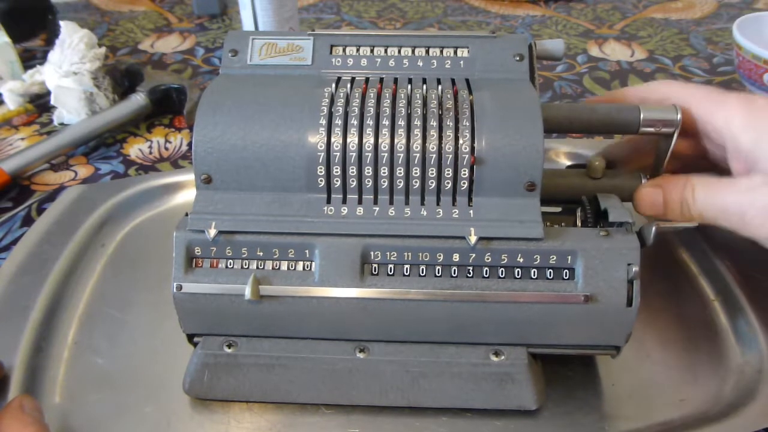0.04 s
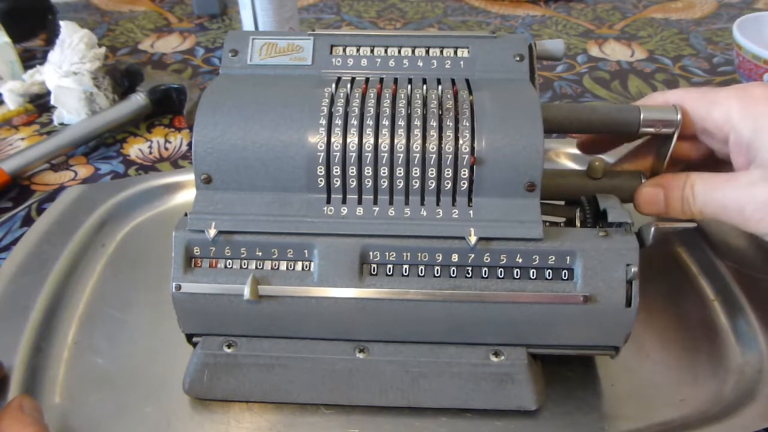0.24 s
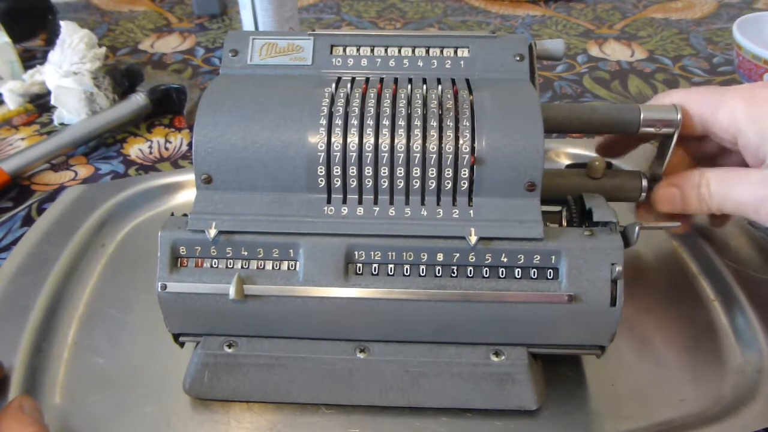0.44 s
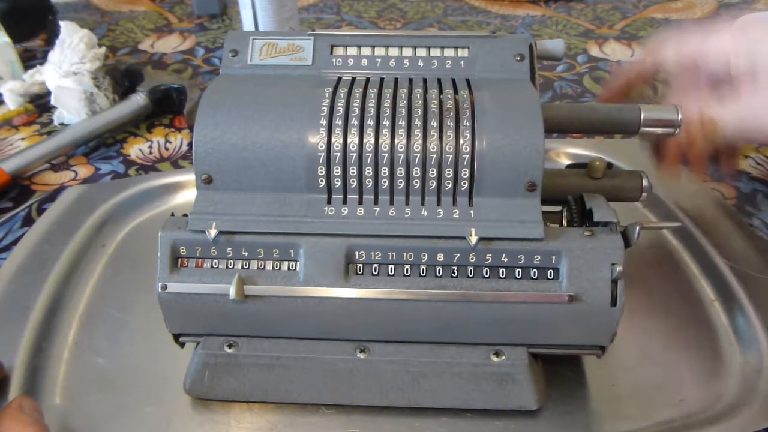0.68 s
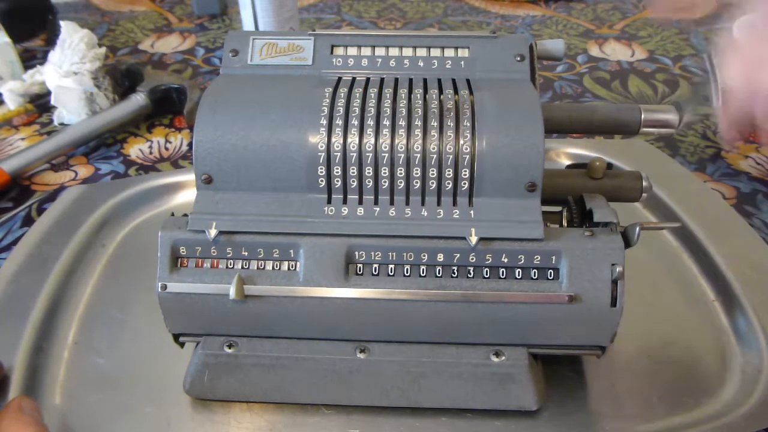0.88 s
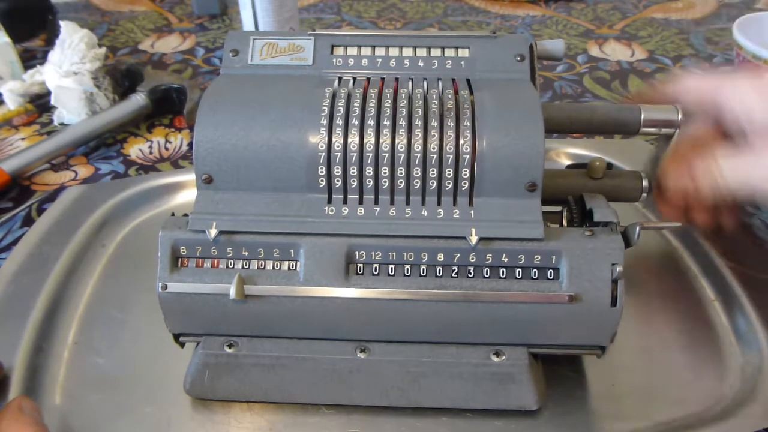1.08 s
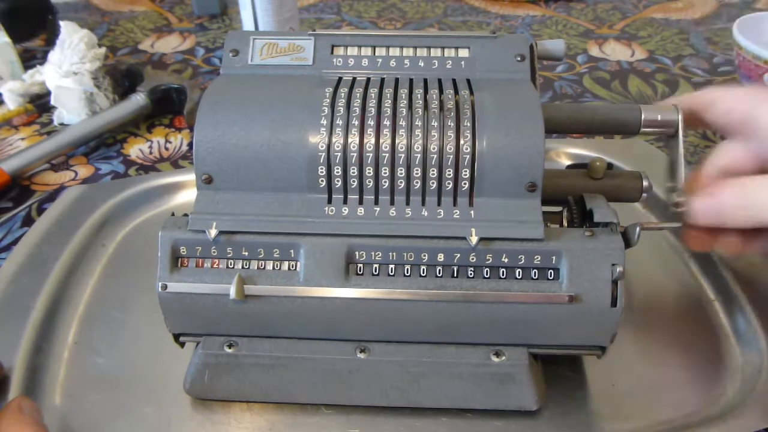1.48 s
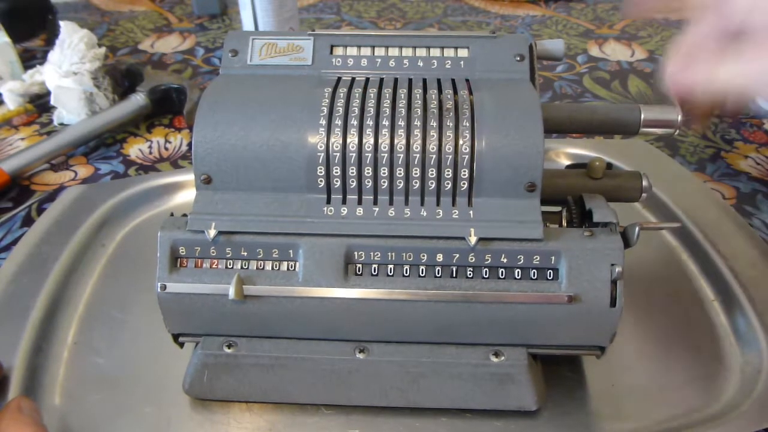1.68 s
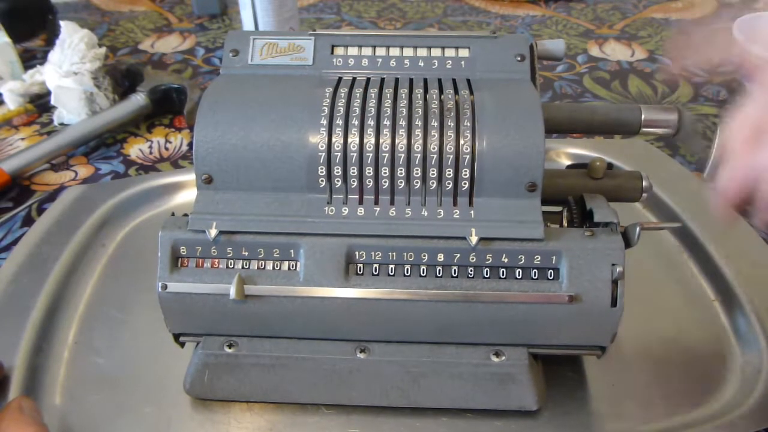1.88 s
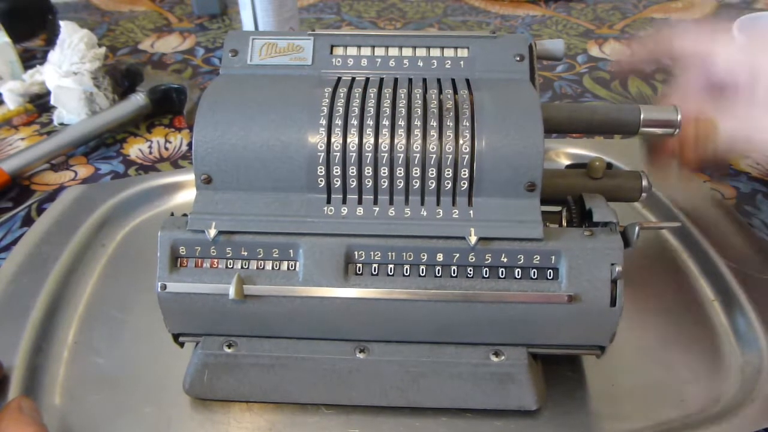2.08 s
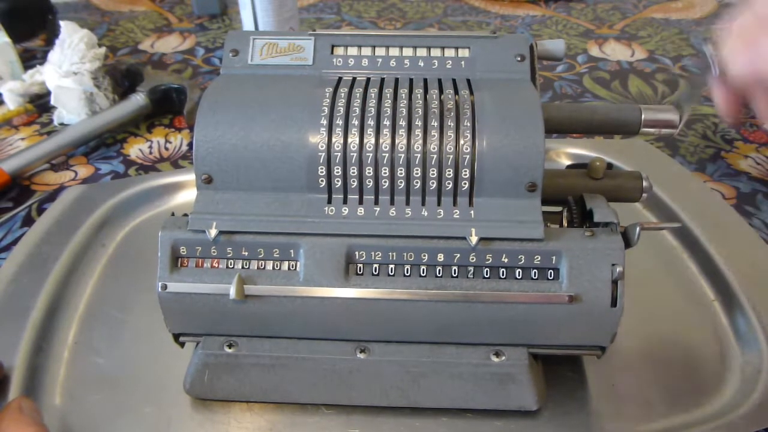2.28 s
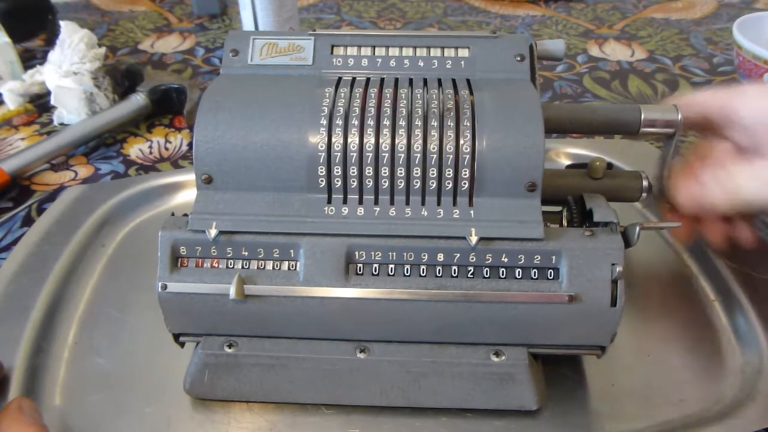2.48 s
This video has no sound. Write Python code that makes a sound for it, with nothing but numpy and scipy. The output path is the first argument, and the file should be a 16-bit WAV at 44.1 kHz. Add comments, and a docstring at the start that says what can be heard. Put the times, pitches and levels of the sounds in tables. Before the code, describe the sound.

A mechanical calculator is worked close up in a small room. A faint high bell fades from the start while a metal lever clacks at 0.15 seconds and again around 0.4. The handle pings lightly at 0.6. The crank then turns four times, at about 0.9, 1.3, 1.8 and 2.3 seconds, each a quick ratchet rattle with snaps and a soft bump. Gears rumble and parts tick between.

```python
"""Pinwheel calculator on a metal tray.

Close up in a small room, its bell is still dying away as a lever clacks over and back.
Loose parts tick and the handle pings. The hand crank makes four turns: the gears rumble,
and on each turn the machine rocks, a pawl rattles over eight teeth and the carry levers
snap after it."""
import sys
import numpy as np
from scipy import signal
from scipy.io import wavfile

SR = 44100
rng = np.random.default_rng(int(sys.argv[2]) if len(sys.argv) > 2 else 0)


def generate_wav(sig):
    """Save sig (samples, or channels by samples) to the path in sys.argv[1] as 16-bit PCM at SR."""
    pcm = np.round(np.clip(np.atleast_2d(sig).T, -1, 1) * 32767).astype(np.int16)
    wavfile.write(sys.argv[1], SR, pcm)


N = 116865


def amp(db):
    """Decibels to gain."""
    return 10 ** (np.asarray(db) / 20)


def unit(x):
    """Scales to a mean energy of 1 per channel."""
    return x / np.sqrt(np.mean(np.sum(x ** 2, -1)) + 1e-20)


def at_hz(points, hz):
    """Interpolates a table on a log-frequency axis."""
    freq_hz, value = np.transpose(points)
    return np.interp(np.log(hz + 1), np.log(freq_hz + 1), value)


def add(mix, start_s, sound):
    """Mixes a sound in at start_s."""
    part = mix[:, max(round(start_s * SR), 0):][:, :sound.shape[-1]]
    part += sound[..., :part.shape[-1]]


def convolve(x, response):
    """Passes both channels through an impulse response."""
    return signal.fftconvolve(x, np.atleast_2d(response), axes=1)[:, :N]


def pan(left_minus_right_db):
    """Left and right gains."""
    return amp([[left_minus_right_db / 2], [-left_minus_right_db / 2]])


def correlate(noises, correlation=0.85):
    """Blends two independent noises into a stereo pair."""
    mid = np.sqrt((1 + correlation) / 2) * noises[0]
    side = np.sqrt((1 - correlation) / 2) * noises[1]
    return np.array([mid + side, mid - side])


def colour(x, spectrum, size=4096):
    """Minimum-phase filter of energy 1, shaped like the spectrum."""
    log_gain = np.log(amp(at_hz(spectrum, abs(np.fft.fftfreq(size, 1 / SR)))))
    response = np.fft.ifft(np.exp(np.conj(signal.hilbert(log_gain)))).real
    return convolve(x, unit(response[:size // 2]))


def ring(modes, rise_s=1e-5):
    """Damped sines; each level sets that mode's energy."""
    t = np.arange(SR // 3) / SR
    attack = 1 - np.exp(-t / rise_s)
    return sum(amp(level_db) * unit(amp(-60 * t / t60_s) * attack * np.sin(2 * np.pi * hz * t))
               for hz, level_db, t60_s in modes)


def resonate(x, modes, gain_db):
    """The ringing that a sound raises in a set of modes."""
    return amp(gain_db) * convolve(x, unit(ring(modes)))


def contact(decay_s, rise_s, size=2048):
    """Metal meets metal: a brief flurry of micro-impacts, energy 1."""
    t = np.arange(size) / SR
    noise = correlate(rng.standard_normal((2, size)))
    return unit(noise * np.exp(-t / decay_s) * (1 - np.exp(-t / rise_s)))


# Room decay: freq_hz, t60_s
ROOM_DECAY = [(100, 0.34), (500, 0.33), (1400, 0.32), (4000, 0.25), (9000, 0.28), (15000, 0.16)]
# Left-right likeness of the echo: freq_hz, correlation
ROOM_CORRELATION = [(100, 1), (700, .94), (1500, 0.89), (4000, 0.91), (12000, 0.69)]


def room_tail(size=256, onset_s=0.0013):
    """A dense echo, each band dying at its own rate."""
    hz, frame_s, bands = signal.stft(rng.standard_normal((2, SR * 2 // 3)), SR, nperseg=size)
    bands = correlate(bands, at_hz(ROOM_CORRELATION, hz)[:, None])
    decay = amp(-60 * frame_s / at_hz(ROOM_DECAY, hz)[:, None])
    echo = signal.istft(bands * decay, SR, nperseg=size)[1]
    t = np.arange(echo.shape[1]) / SR
    return unit(echo * (1 - np.exp(-(t / onset_s) ** 2)))


def room(x, wet_db, tails=4, cycle_s=0.03):
    """A sound plus its echo; tails take turns, so no two hits echo quite alike."""
    position = np.arange(N) / SR / cycle_s * tails
    distances = [np.minimum(abs((position - k) % tails - tails / 2), 1) for k in range(tails)]
    echo = sum(convolve(x * np.cos(np.pi / 2 * d), room_tail()) for d in distances)
    return x + amp(wet_db) * echo


def hush():
    """Faint, dull, steady room noise."""
    # freq_hz, level_db
    spectrum = [(20, 8), (60, -11), (200, -3), (1000, 0), (4000, -43), (15000, -43)]
    return amp(-63.5) * colour(correlate(rng.standard_normal((2, N)), 0.52), spectrum)


# Bell modes: freq_hz, level_db, t60_s
BELL_MODES = [(4050, -31.5, 1.37), (4043.5, -61, 1.2), (9900, -52, 0.35)]


def bell():
    """The last of a stroke on the small warning bell."""
    t = np.arange(N) / SR
    return pan(-2) * sum(amp(level_db - 60 * t / t60_s) * np.sin(2 * np.pi * hz * t)
                         for hz, level_db, t60_s in BELL_MODES)


# Lever blows: start_s, crack_db, knock_db, lever_db, case_db, case_hz, thud_db
LEVER_BLOWS = [(0.1359, -1, -6.5, 5, -19, 800, -41), (0.1591, -3, 8, 4, 5, 762, -39),
               (0.1639, -1.5, -7.5, 0.5, -1.5, 717, -28), (0.3384, 1, -2, -2.5, 6.5, 740, -22.5),
               (.3648, -0.5, 2.5, 5.5, 4.5, 714, -31), (0.4018, -3, -8, 2.5, -4, 764, -13),
               (0.4066, -0.5, -6, -0.5, 10.5, 795.4, -3.5), (0.4163, -3.5, 1.5, -4, 10, 795, -6.5),
               (0.4244, -1.5, -5, 1, -26, 760, -20)]
# Lever modes: freq_hz, level_db, t60_s
LEVER_MODES = [(1204, -15, 0.12), (1538, -21, 0.07), (1634, -10.5, 0.072), (1830, -4, 0.013),
               (2890, -13, 0.075), (3950, -11, 0.022), (5435, -12.5, 0.01), (7070, -11, 0.013)]
# Case modes: pitch_ratio, level_db, t60_s
CASE_MODES = [(.9, -17, 0.037), (1.001, -2.5, 0.063), (1.09, -8.5, 0.028)]
# Spectra of a blow's three parts: freq_hz, level_db
CRACK_SPECTRUM = [(60, -17.5), (500, -26.5), (1000, -16), (2300, -5.5), (3600, -2.5), (7000, 0),
                  (10000, -2.5), (15500, -14.5)]
KNOCK_SPECTRUM = [(60, -25), (450, -17), (700, -6.5), (1150, -0.5), (1700, 2), (2400, -2.5), (3300, 2.5),
                  (5500, -6.5), (9000, -47), (15500, -31)]
THUD_SPECTRUM = [(30, -18), (80, -15), (125, 1.5), (200, -2.5), (320, 5.5), (470, 0), (650, -2), (1500, 1),
                 (8000, -55)]


def lever_clacks(ring_rise_s=0.0022):
    """Each blow cracks, knocks and thuds into the tray, and rings the lever and the case."""
    crack, knock, thud, rings = np.zeros((4, 2, N))
    for start_s, crack_db, knock_db, lever_db, case_db, case_hz, thud_db in LEVER_BLOWS:
        add(crack, start_s, amp(crack_db) * contact(decay_s=0.0024, rise_s=0.001))
        add(knock, start_s, amp(knock_db) * contact(decay_s=0.0028, rise_s=0.00038))
        lever = [(hz * (1 + 0.012 * rng.standard_normal()), db, t60_s) for hz, db, t60_s in LEVER_MODES]
        case = [(ratio * case_hz, db, t60_s) for ratio, db, t60_s in CASE_MODES]
        add(rings, start_s, amp(lever_db) * ring(lever, ring_rise_s))
        add(rings, start_s, amp(case_db) * ring(case, ring_rise_s))
        add(thud, start_s, amp(thud_db) * contact(decay_s=0.0062, rise_s=0.0045))
    blows = colour(crack, CRACK_SPECTRUM) + colour(knock, KNOCK_SPECTRUM) + colour(thud, THUD_SPECTRUM)
    return amp(0.5) * (pan(-1.5) * room(blows, wet_db=-1) + room(rings, wet_db=-6.5, tails=2))


# Light contacts: start_s, level_db
TICK_HITS = [(.567, -5), (0.6239, -7), (0.7723, -30), (0.7875, -8.5), (0.8317, -10.5), (1.2484, -6.5),
             (1.29, -17), (1.6199, -9.5), (1.6917, -13.5), (1.763, -13.5), (2.0858, -10.5), (2.1285, -11.5),
             (2.170, -6), (2.2222, -15), (2.4759, -6), (2.5731, -8.5), (2.642, -16)]
# Tick spectrum: freq_hz, level_db
TICK_SPECTRUM = [(100, -22), (600, 2), (1800, -2), (3200, 0.5), (6000, 0.5), (9000, -5), (15500, -10.5)]


def ticks():
    """The handle and loose parts touch lightly."""
    hits = np.zeros((2, N))
    for start_s, level_db in TICK_HITS:
        add(hits, start_s, amp(level_db) * contact(decay_s=0.0013, rise_s=0.0002))
    return amp(-8) * pan(-1.26) * room(colour(hits, TICK_SPECTRUM), wet_db=-1, tails=2)


# Handle modes: freq_hz, level_db, t60_s
HANDLE_MODES = [(3100, -15, .07), (5850, -12, .05), (6500, -16, .04), (12400, -30, .06)]


def handle_ping(start_s=0.5678):
    """The handle rings as the hand lets go."""
    ping = np.zeros((2, N))
    add(ping, start_s, ring(HANDLE_MODES, rise_s=0.00047))
    return ping


# Gear noise envelope: time_s, level_db
GEAR_ENVELOPE = [(0, -5), (.3, -4.5), (.55, -3.5), (.65, 5), (.74, 5.5), (.79, 10.5), (.95, 8.5),
                 (1.13, 2.5), (1.2, 4), (1.28, 8), (1.45, 3.5), (1.6, 0.5), (1.68, 5), (1.76, 8.5),
                 (2.05, 2), (2.2, 7.5), (2.4, 7.5), (2.55, 2), (2.65, 5)]
# Gear spectrum: freq_hz, level_db
GEAR_SPECTRUM = [(40, -26), (130, -24.5), (210, -9.5), (600, 1.5), (900, 11.5), (1900, 11), (2600, 4),
                 (4500, 3.5), (9000, -1.5), (15500, -11.5)]
# Housing and tray modes: freq_hz, level_db, t60_s
HOUSING_MODES = [(781, -2, 0.21), (817.6, 3.5, 0.14), (922.5, 3, 0.055), (1057, -1, 0.093),
                 (1153, -2.5, 0.17), (1462.5, -1.5, 0.078), (1828, -12, 0.077), (1869, 2.5, 0.1),
                 (4350, -5, 0.036)]
TRAY_MODES = [(216.2, -0.5, 0.75), (325, -7, 0.24), (473.3, -2.5, 0.14)]


def gears(knocks_per_s=4500, spread_db=2.8, gain_db=-52.5):
    """Tiny knocks of meshing teeth make a scratch that shakes housing and tray."""
    strengths = amp(spread_db * np.minimum(rng.exponential(1, N), 4))
    strengths *= rng.random(N) < knocks_per_s / SR
    knocks = unit(correlate(rng.standard_normal((2, N))) * strengths) * np.sqrt(N)
    envelope = amp(gain_db + np.interp(np.arange(N) / SR, *np.transpose(GEAR_ENVELOPE)))
    scratch = room(colour(knocks * envelope, GEAR_SPECTRUM), wet_db=-6.5, tails=2)
    housing = resonate(scratch, HOUSING_MODES, gain_db=-11)
    tray = resonate(scratch, TRAY_MODES, gain_db=-3.5)
    return scratch + housing + tray


# Crank turns: start_s, tooth_gap_s, level_db
CRANK_TURNS = [(.8568, .0100, 0), (1.3175, .0110, 0), (1.7915, .0108, 0), (2.2550, .01265, -.3)]
# The eight teeth in order: level_db
TOOTH_LEVELS_DB = [-4, 1.5, -.5, -.5, -.3, -1.8, -1, -3]
# Carry levers snapping home: start_s, level_db
CARRY_SNAPS = [(.9575, -8), (.967, 0), (1.0189, -9.5), (1.426, -5.5), (1.4377, -2), (1.4919, -10),
               (1.901, -7), (1.9122, -1.5), (1.968, -10), (2.328, -9), (2.392, -14)]
# Pawl and carry click spectrum: freq_hz, level_db
CLICK_SPECTRUM = [(40, -32), (130, -21.5), (300, -12), (450, -7.5), (600, -12.5), (850, 0), (1400, -6),
                  (2100, 1.5), (2800, -3), (4200, 3.5), (5500, 0), (7500, 0.5), (10000, -1.5), (15500, -3)]


def ratchet(decay_s=0.0017, rise_s=0.0003, rebound_s=0.005, rebound_db=-8.5, slowing=0.0075):
    """The pawl drops off each tooth and rebounds as the crank slows; the carry levers follow."""
    hits = np.zeros((2, N))
    for start_s, tooth_gap_s, turn_db in CRANK_TURNS:
        for k, tooth_db in enumerate(TOOTH_LEVELS_DB):
            drop_s = start_s + k * tooth_gap_s * (1 + slowing * k)
            gain = amp(turn_db + tooth_db)
            add(hits, drop_s, gain * contact(decay_s, rise_s))
            bounce_s = drop_s + rebound_s * rng.uniform(0.6, 1.4)
            add(hits, bounce_s, gain * amp(rebound_db) * contact(decay_s, rise_s))
    for start_s, level_db in CARRY_SNAPS:
        add(hits, start_s, amp(level_db) * contact(decay_s, rise_s))
    clicks = colour(hits, CLICK_SPECTRUM)
    housing = resonate(clicks, HOUSING_MODES, gain_db=-9.5)
    return amp(3.5) * pan(-1.26) * (room(clicks, wet_db=-2) + housing)


# Modes of the machine rocking on its tray: freq_hz, level_db, t60_s
ROCKING_MODES = [(45, -32, 0.36), (82.5, -31.5, 0.033)]


def rocking(delay_s=0.008):
    """A soft low bump once a turn, as the teeth engage."""
    bumps = np.zeros((2, N))
    for start_s, _, turn_db in CRANK_TURNS:
        add(bumps, start_s + delay_s, amp(turn_db) * ring(ROCKING_MODES, rise_s=0.01))
    return bumps


def scene():
    """The machine over the hush of the room."""
    return hush() + bell() + lever_clacks() + ratchet() + gears() + rocking() + ticks() + handle_ping()


def record(dry):
    """Low-pass and a slight DC offset."""
    cutoff_hz, dc_offset = 15650, -0.0034
    lowpass = signal.firwin(255, cutoff_hz, window=("kaiser", 9), fs=SR)
    return dc_offset + signal.oaconvolve(dry, lowpass[None], "same")


dry = scene()
out = record(dry)
generate_wav(out)
```